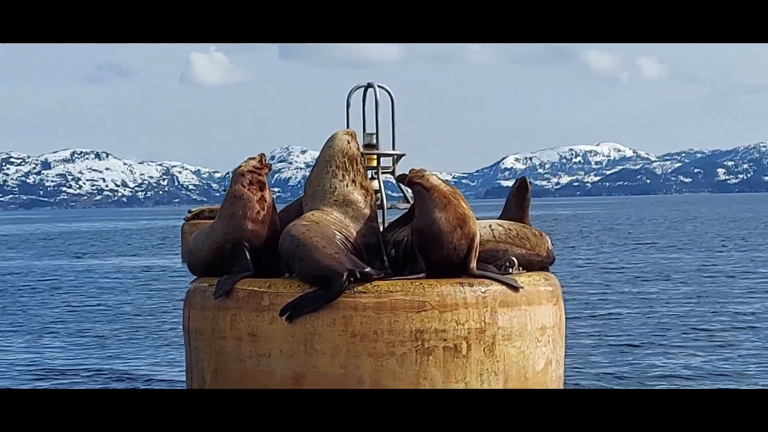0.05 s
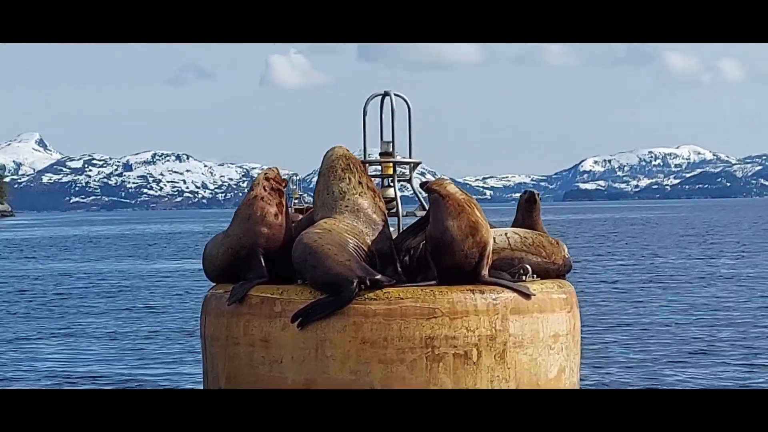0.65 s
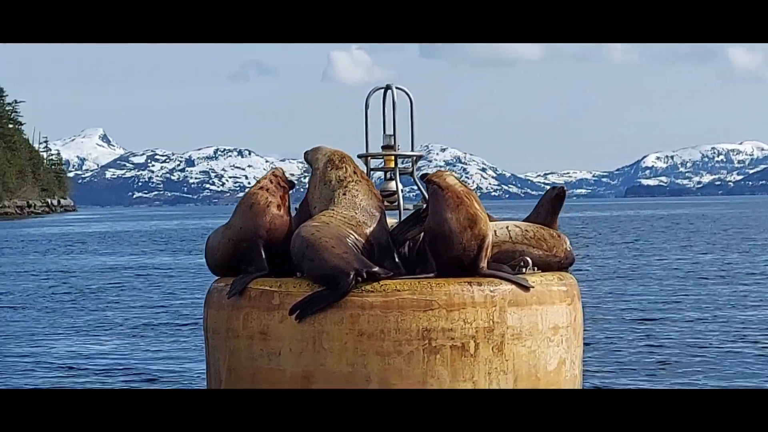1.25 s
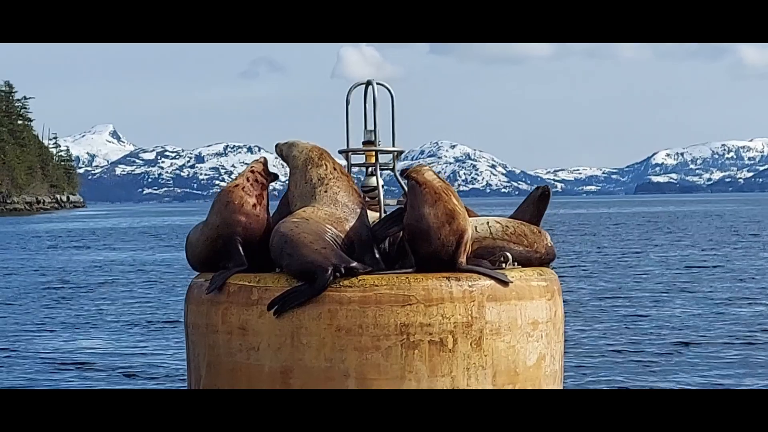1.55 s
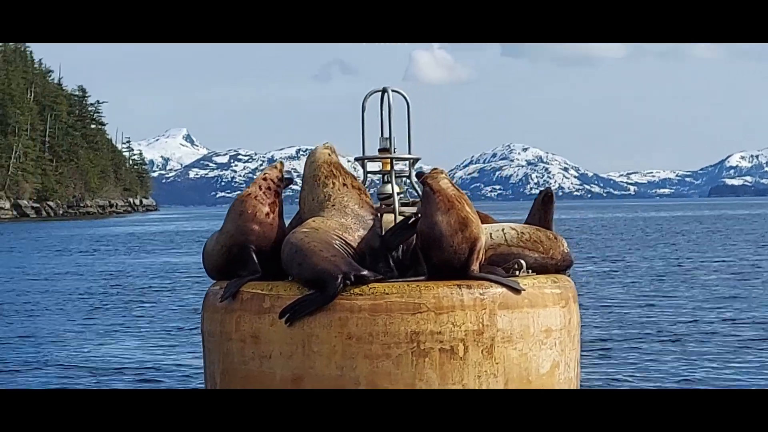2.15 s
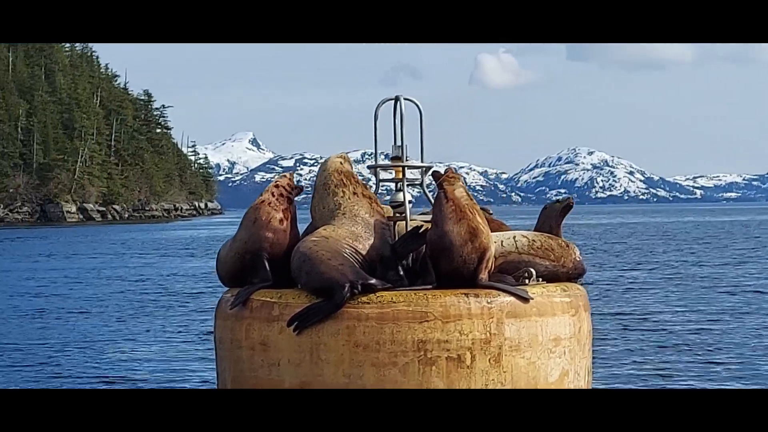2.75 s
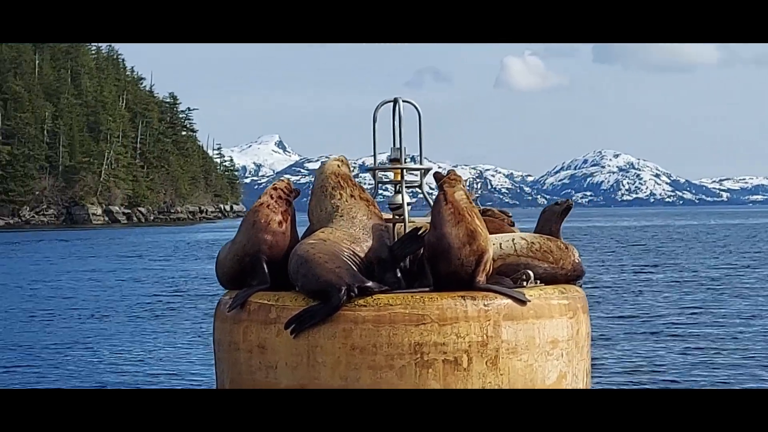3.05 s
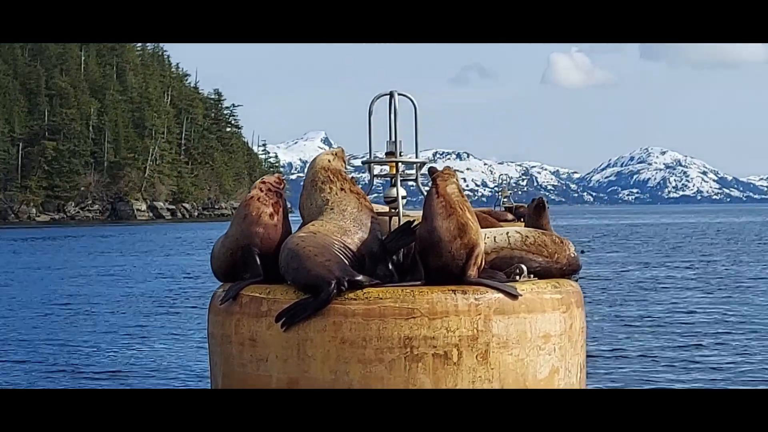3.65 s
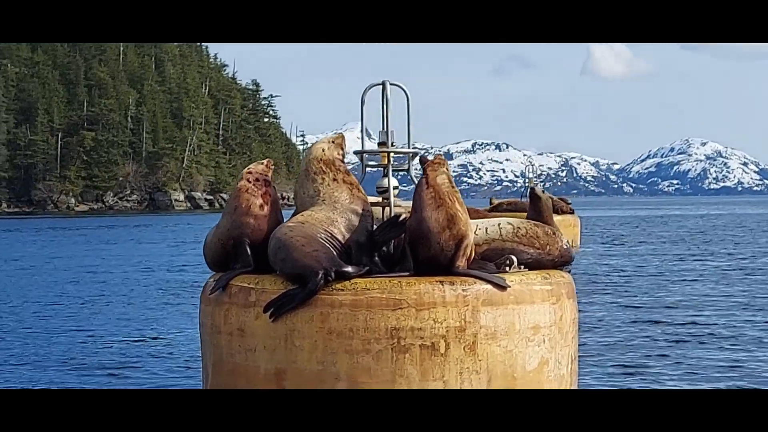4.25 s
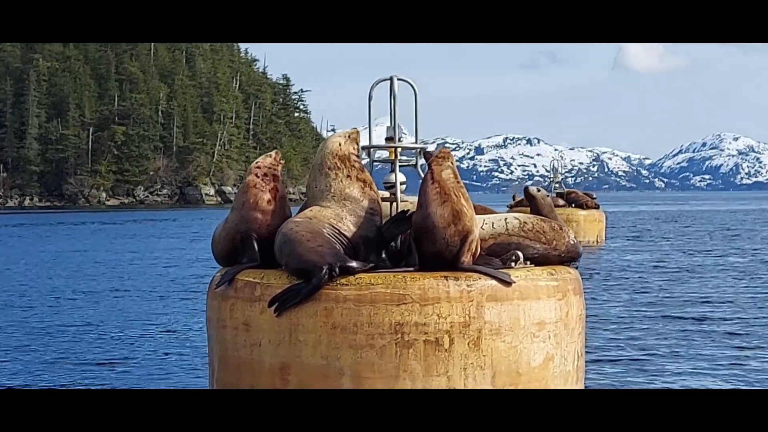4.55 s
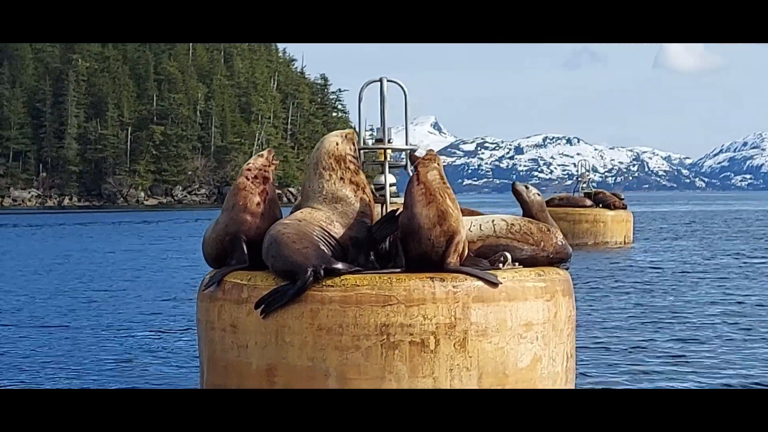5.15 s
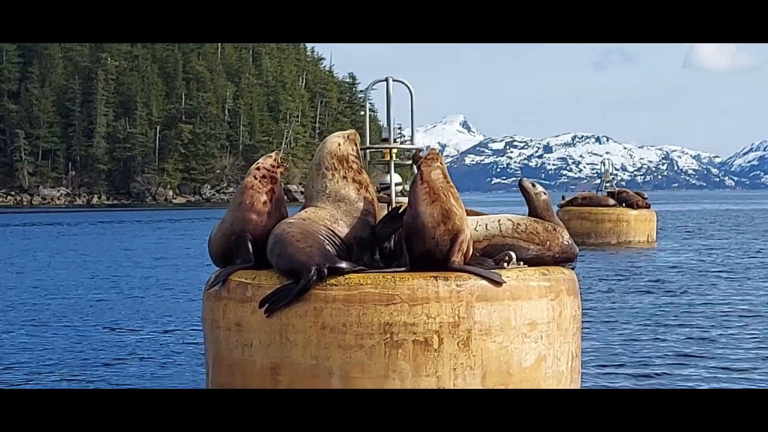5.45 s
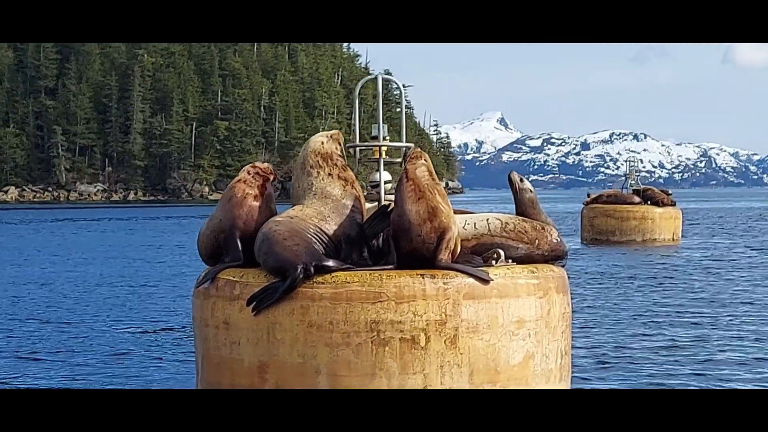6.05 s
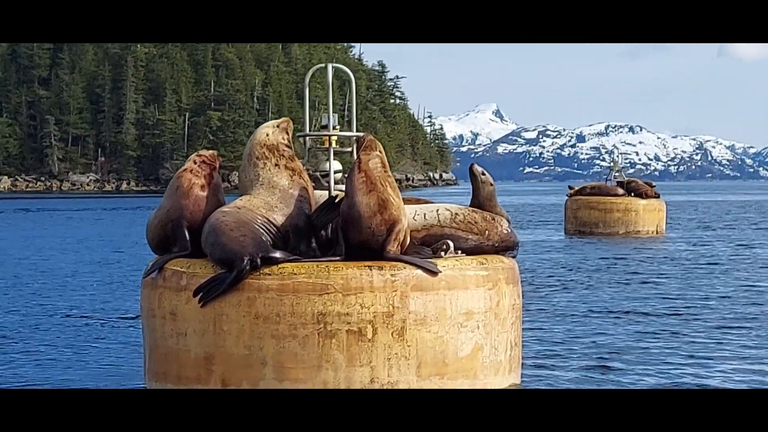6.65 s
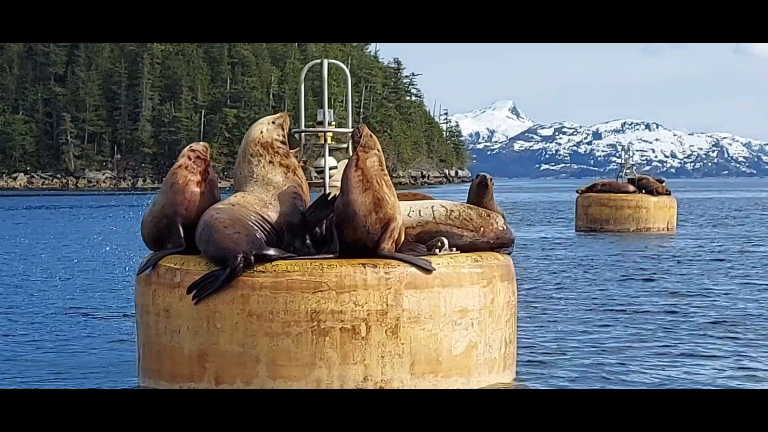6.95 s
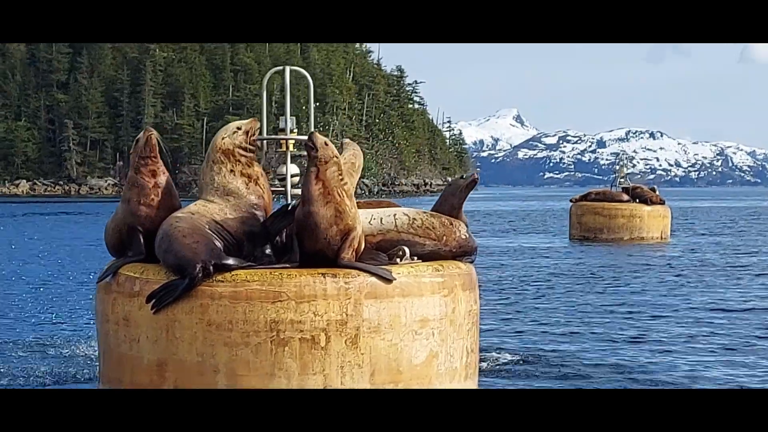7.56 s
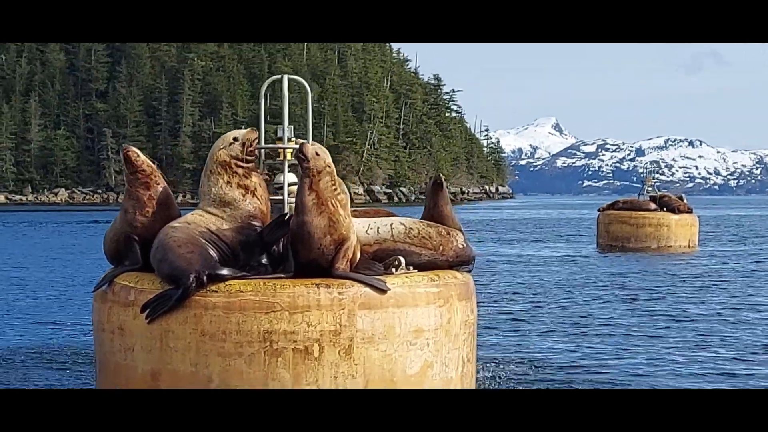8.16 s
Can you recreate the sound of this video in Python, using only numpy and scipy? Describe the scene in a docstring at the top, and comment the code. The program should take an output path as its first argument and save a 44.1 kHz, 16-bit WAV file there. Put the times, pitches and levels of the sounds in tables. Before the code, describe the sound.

Sea lions on a steel buoy give a loud rough roar, a hoarse rasp and a run of low growls. After a short pause comes a throaty bellow, then quieter growls and a rattle. A light splash follows near the end, with two more hoarse growls. The microphone is on an idling boat, its engine throbbing low throughout, with wind bumps, faint lapping water and scattered small knocks.

```python
"""Sea lions roar and growl on a steel buoy, heard across water from an idling boat.
Each call is a train of throat flaps, about 20-65 a second, that ring the animal's mouth and chest
and hiss through its jaws. The engine throbs below, wind bumps the microphone, water laps and
splashes, and small knocks sound. Calls and knocks echo briefly off buoy, water and boat."""
import sys
import numpy as np
from scipy import signal
from scipy.fft import rfft, irfft, next_fast_len
from scipy.io import wavfile
from scipy.ndimage import uniform_filter1d, map_coordinates

SR = 44100
rng = np.random.default_rng(int(sys.argv[2]) if len(sys.argv) > 2 else 0)


def digitize_waveform(pressure):
    """Quantize a signal to 16-bit integers and store it at the path in sys.argv[1].

    Rows of a 2-D input are taken as channels; values are limited to [-1, 1].
    """
    field = np.atleast_2d(pressure).T
    bounded = np.clip(field, -1, 1)
    quanta = np.round(bounded * 32767).astype(np.int16)
    wavfile.write(sys.argv[1], SR, quanta)


N = 371322
T = np.arange(N) / SR

# Jaw resonances of growls and rattle. Each row: centre in Hz, width in Hz, relative gain in dB.
GROWL_JAWS = [(1310, 130, 8), (1840, 180, 10), (2180, 180, 3), (3200, 170, -15.5), (3900, 280, -13.5),
              (5000, 390, -9.5), (8200, 1600, -22)]
# A wave breaking on the buoy. Each row: time in seconds, base level in dB.
SPLASH = [(7.06, -72), (7.24, -60.5), (7.48, -55.5), (7.8, -55.5), (7.9, -67), (8, -101)]


def sea_lions():
    """A crisp roar, a hoarse rasp, a bellow that opens into a higher vowel, a rattle and growls."""
    # Calls. Each row: time in seconds, flaps per second, mouth resonance in Hz, base level in dB.
    roar = [(0.212, 40.6, 710, -26), (0.31, 41.6, 698, -25), (0.407, 43.6, 715, -24),
            (0.504, 51.5, 697, -19), (0.602, 52.1, 687, -21.5), (0.699, 48.8, 709, -23),
            (0.757, 32, 717, -24.5), (0.802, 21.7, 700, -30.5)]
    rasp = [(0.817, 52.6, 680, -48), (0.925, 54.65, 680, -42.5), (1.0, 57.46, 605, -33.5),
            (1.15, 57.04, 643, -37.5), (1.25, 65.07, 600, -30.5), (1.33, 54.15, 620, -34.5),
            (1.39, 56.47, 636, -31), (1.45, 50.6, 615, -38), (1.52, 48.8, 590, -30)]
    bellow = [(4.066, 45, 597, -33.5), (4.125, 50.48, 616, -27.5), (4.28, 55.87, 603, -23),
              (4.358, 59.4, 628, -27)]
    bellow_tail = [(4.366, 57.5, 676, -29.5), (4.437, 56.5, 699, -27), (4.48, 55.5, 670, -27.5),
                   (4.583, 53.3, 659, -27), (4.7, 53, 652, -27.5), (4.755, 42, 673, -36),
                   (4.795, 19, 670, -35)]
    rattle = [(5.939, 22.44, 635, -45.5), (6.048, 29.24, 680, -39), (6.156, 31.75, 613, -39),
              (6.265, 26.6, 630, -39), (6.374, 26.44, 660, -47.5), (6.49, 27.6, 625, -44)]
    # Throat resonances, mouth at rest. Each row: centre in Hz, width in Hz, relative gain in dB.
    roar_throat = [(410, 87, -9), (696.5, 39.5, 12.5), (994, 165, -9.5), (1023, 41, -8.5), (1545, 140, -17),
                   (1820, 41, -20.5)]
    rasp_throat = [(357, 74, -2), (596, 69, -1), (737, 65, -4.5), (1170, 110, -17), (1610, 89, -26)]
    bellow_throat = [(403, 46, -3.5), (617, 23, -0.5), (746, 230, -21.5), (948, 94, -17), (1550, 44, -36)]
    bellow_tail_throat = [(383, 32, 2.5), (634, 88, 2.5), (702, 67, 2), (957, 47, -14), (1140, 220, -30.5),
                          (1630, 110, -31.5)]
    rattle_throat = [(381, 45, 13), (660, 200, 2), (976, 120, 1.5), (2000, 71, -20)]
    # Front of the mouth, shaped by tongue and lips.
    # Each row: time in seconds, resonance in Hz, its level and the jaw hiss in dB re the throat.
    roar_lips = [(.215, 3040, -24, -30), (.26, 2970, -30, -22), (.29, 2300, -19, -34),
                 (.34, 2370, -33, -47), (.4, 3270, -35, -25.5), (.55, 3270, -41, -38),
                 (.62, 3390, -30, -29), (.71, 3380, -30, -25.5), (.76, 3500, -50, -26.5)]
    rasp_lips = [(.83, 1100, -6.5, -10), (1.0, 1090, -15, -18.5), (1.2, 1030, -16, -21.5),
                 (1.31, 1120, -14, -32), (1.4, 1187, -4.5, -11), (1.445, 1190, -5.5, -13),
                 (1.475, 1240, -15, -31)]
    bellow_lips = [(4.064, 1830, -24, -27), (4.115, 1820, -16, -35), (4.21, 1780, -25, -41),
                   (4.3, 1870, -27.5, -29.5)]
    bellow_tail_lips = [(4.4, 1580, -29, -28.5), (4.5, 1470, -31, -34), (4.6, 1680, -29, -35),
                        (4.8, 1550, -36, -34)]
    rattle_lips = [(6, 1900, -33, -40)]
    # Jaw resonances. Each row: centre in Hz, width in Hz, relative gain in dB.
    roar_jaws = [(2015, 77, 17), (2620, 60, -8), (4270, 120, -9), (4980, 110, 0), (8050, 1000, -16)]
    rasp_jaws = [(1550, 110, 9), (1925, 240, 0), (2500, 120, -6), (3070, 110, -19), (3380, 42, -18)]
    bellow_jaws = [(2220, 99, 4), (2630, 65, 1), (3100, 60, 5), (3830, 60, -1), (4180, 51, 15),
                   (5200, 71, -9), (7900, 1800, -20)]
    bellow_tail_jaws = [(2040, 380, 1), (2600, 100, 0), (3170, 160, -5), (3760, 180, -3), (4290, 130, 10),
                        (5100, 230, 1), (7850, 1800, -15)]
    # Flap textures. Each: roughness, puff t60 in seconds, level scatter in dB.
    crisp, throaty, hoarse = (.3, .026, 1.0), (.6, .036, 1.2), (.8, .024, 1.8)
    return (call(roar, roar_throat, roar_lips, roar_jaws, crisp, rest_hz=701.5,
                 gain_db=-2.5, gargle=.016)
            + call(rasp, rasp_throat, rasp_lips, rasp_jaws, hoarse, rest_hz=620, gain_db=-.5,
                   overtone_db=-25, gargle=.021, gargle_db=-1, click=.74, hiss_t60_s=.027)
            + call(bellow, bellow_throat, bellow_lips, bellow_jaws, throaty, rest_hz=604.5,
                   gain_db=-1, click=.8, gargle=.013)
            + call(bellow_tail, bellow_tail_throat, bellow_tail_lips, bellow_tail_jaws, throaty,
                   rest_hz=673, click=.53, gargle=.015)
            + call(rattle, rattle_throat, rattle_lips, GROWL_JAWS, crisp, rest_hz=636,
                   gain_db=.5, flutter=.14)
            + growls())


def growls(attack_s=.06, release_s=.061, lips_hz=905, shut_db=-11, puff_t60_s=.02, scatter_db=1.1):
    """Flap rate and mouth glide evenly; lips and hiss peak mid-growl, where the jaws are widest."""
    # Each row: start and length in seconds, first and last flaps per second, first and last mouth
    # resonance in Hz, level in dB, roughness, lips and hiss in dB re the throat.
    events = [(1.557, .63, 31.4, 31.3, 612, 672, -33.8, 0.1, -19, -32),
              (2.224, 0.52, 51, 38.2, 655, 660, -30.5, 0.33, -15, -19),
              (2.755, .12, 33.7, 34.4, 675, 690, -32.5, 0.25, -16, -22),
              (2.87, 0.13, 38, 54, 697, 655, -27.5, 0.18, -26, -25),
              (3.007, 0.12, 49, 50, 640, 650, -32, 0.3, -25, -22),
              (3.148, 0.22, 55, 48, 636, 557, -34, 0.35, -24, -22),
              (5.14, 0.18, 56, 48, 570, 600, -46, 0.5, -26, -28),
              (5.46, .2, 47, 48, 570, 600, -47.5, 0.6, -24, -30),
              (8.066, .2, 38.7, 42, 631, 700, -35.5, 1.3, -13, -20),
              (8.28, .22, 46.5, 56, 651, 720, -33, 1.4, -14, -20)]
    # Each row: centre in Hz, width in Hz, relative gain in dB.
    throat = [(98, 55, 8), (230, 150, -1), (405.5, 30, 4), (689, 48, 5), (604.6, 75, 5.5), (893, 56, -13),
              (1310, 54, -37)]
    envelope_db, closing_db = np.array([-2, 0, 0, -6]), shut_db * np.array([1, 0, 1])
    voice = np.zeros(N)
    for s, length_s, rate0, rate1, hz0, hz1, db, rough, lips_db, hiss_db in events:
        knees_s = np.sort([0, attack_s, length_s - release_s, length_s])
        glide = lambda a, b: a + (b - a) * knees_s / length_s
        contour = np.transpose([s + knees_s, glide(rate0, rate1), glide(hz0, hz1), db + envelope_db])
        lips_s = s + length_s * np.array([0, .5, 1])
        lips = np.transpose([lips_s, [lips_hz] * 3, lips_db + closing_db / 2, hiss_db + closing_db])
        texture = (rough, puff_t60_s, scatter_db)
        voice += call(contour, throat, lips, GROWL_JAWS, texture, rest_hz=640, gargle=.045, gargle_db=4)
    return voice


def call(contour, throat, lips, jaws, texture, rest_hz, gain_db=0, gargle=.0052, gargle_db=6.5,
         gargle_per_s=22.16, overtone_db=-30, hiss_t60_s=.023, click=.4, flutter=.036, chest_hz=500):
    """Each throat flap is a sharp closure and a dying puff of air; both ring throat, lips and jaws."""
    rough, puff_t60_s, scatter_db = texture
    span_s = np.arange(contour[0][0], contour[-1][0], 1 / SR)
    cycles = np.cumsum(curves(contour, span_s)[0]) / SR
    flaps_s = np.interp(np.arange(int(cycles[-1]) + 1), cycles, span_s)
    count = len(flaps_s)
    flap_hz, mouth_hz, db = curves(contour, flaps_s)
    flaps_s += .05 * rough * rng.standard_normal(count) / flap_hz  # a rough throat flaps unevenly
    lips_hz, lips_db, hiss_db = curves(lips, flaps_s[:, None])
    t, hz = np.arange(4096) / SR, np.fft.rfftfreq(4096, 1 / SR)

    def unit_energy(x):
        return x / np.linalg.norm(x, axis=1, keepdims=True)

    def puff(t60_s, rise_s=.0016):
        envelope = amp(-60 * t / t60_s) * (1 - np.exp(-t / rise_s))
        return rfft(unit_energy(rng.standard_normal((count, len(t))) * envelope))

    def drift():
        knots = abs(flaps_s - flaps_s[0]) * gargle_per_s
        return map_coordinates(rng.standard_normal(2 * count), [knots])[:, None]

    # The jaw shifts the mouth's resonances at each flap; the chest's stay.
    shift = (mouth_hz / rest_hz * (1 + flutter * rough * rng.standard_normal(count)))[:, None]
    modes = [(f if f < chest_hz else f * shift, width, level) for f, width, level in throat]
    radiated = minimum_phase(resonances(modes, hz) * highpass(hz, 130))  # a mouth radiates little bass
    rings = unit_energy(irfft((1 + rough * puff(puff_t60_s)) * radiated))
    lip_modes = [(lips_hz, 70, 0), (1.35 * lips_hz, 300, -22), (2.8 * lips_hz, 300, overtone_db)]
    lip_band = hz / np.hypot(hz, lips_hz) / np.hypot(1, (hz / 4500) ** 2)
    lip_ring = irfft((click + puff(hiss_t60_s)) * resonances(lip_modes, hz) * lip_band)
    rings += amp(lips_db) * unit_energy(lip_ring)
    # Gargle: each resonance of the wet jaws wanders in pitch and strength.
    jaw_modes = [(f * (1 + gargle * drift()), width, level + gargle_db * drift())
                 for f, width, level in jaws]
    hiss = irfft((click + puff(hiss_t60_s)) * resonances(jaw_modes, hz) * hz / np.hypot(hz, 1500))
    rings += amp(hiss_db) * unit_energy(hiss)
    sizes = amp(db + gain_db + scatter_db * rng.standard_normal(count)) * np.sqrt(SR / flap_hz)
    voice = np.zeros(N)
    for s, size, ring in zip(flaps_s, sizes, rings):
        add(voice, s, size * ring)
    return voice


def engine(firing_hz=32, tone_db=-4, thump_db=-8, waver_db=4.5, hull_db=-35, hull_db_per_db=.35):
    """Uneven firings thump the exhaust; low orders hum and the hull drones in time with them."""
    # Each row: time in seconds, base level in dB.
    levels = [(0.0, -43.5), (0.2, -32), (1.15, -31), (1.6, -35.5), (1.9, -45.5), (2.1, -32), (2.8, -26),
              (3.1, -32.5), (3.45, -33), (3.6, -41), (3.95, -34.5), (5.0, -34), (5.7, -47), (6.5, -35.5),
              (7.5, -40), (8.1, -39.5)]
    # Each row: multiple of the firing rate, relative level in dB.
    orders = [(2, -17), (3, 6), (4, 10.5)]
    # Each row: centre in Hz, width in Hz, relative gain in dB.
    exhaust_modes = [(63.4, 44, -1.5), (101.8, 30, 1.5), (296, 50, -9.5)]
    # Each row: frequency in Hz, relative density in dB.
    hull_spectrum = [(60, -10), (150, -4), (200, -11.5), (260, -4), (315, 4), (370, -6), (430, -6),
                     (500, -10), (640, -13), (800, -21), (1200, -24.5), (2500, -40.5), (6000, -81)]
    stereo_wobble = lambda per_s: np.array([wobble(per_s), wobble(per_s)])
    level_db, = curves(levels)
    cycles = firing_hz * T + .04 * wobble(3) - .2
    sizes = amp(3.5 * np.tanh(wobble(28)) + 3.5 * np.tanh(stereo_wobble(24)))
    firings = np.diff(np.floor(cycles), prepend=-1) * sizes
    thumps = unit(filtered(firings, lambda hz: -resonances(exhaust_modes, hz) * highpass(hz, 50)))
    hum = sum(amp(db + 2 * stereo_wobble(9)) * np.sin(2 * np.pi * k * cycles + .9 * stereo_wobble(5))
              for k, db in orders)
    exhaust = amp(thump_db) * thumps + amp(tone_db) * unit(hum)
    exhaust *= amp(level_db + waver_db * np.tanh(wobble(14)))
    throb = 1 + .35 * np.cos(2 * np.pi * cycles - 1)
    hull = unit(rush(hull_spectrum, patchy_db=3) * throb * amp(wobble(16)))
    hull *= amp(hull_db + hull_db_per_db * (level_db - level_db.mean()))
    return exhaust * pan(1.6) + hull


def wind(breeze_db=-39.5, lump_db=3, bump_db=-4, bump_hz=90, rise_s=.0041):
    """A gusty breeze buffets the microphone, with single soft bumps."""
    # Each row: centre and half width in seconds, level in dB.
    gusts = [(.2, 0.065, -35), (1.3, 0.057, -31), (1.68, 0.22, -34), (2.35, 0.062, -28), (2.8, 0.24, -37),
             (4.15, 0.22, -36), (4.65, 0.13, -41), (5.4, .15, -37.5), (6.1, 0.39, -37), (8.03, 0.11, -29)]
    # Each row: frequency in Hz, relative density in dB.
    buffet_spectrum = [(10, -17), (30, -11), (60, -4.5), (100, -1), (200, -9.5), (500, -23), (2000, -65)]
    # Each row: time in seconds, base level in dB.
    bumps = [(1.245, -16), (1.569, -16.5), (1.602, -13.5), (5.303, -17), (5.665, -20.5), (6.489, -17),
             (6.617, -20.5), (7.683, -19), (7.993, -19)]
    gust_power = sum((amp(db) * swell(s, width_s)) ** 2 for s, width_s, db in gusts)
    strength = np.sqrt(amp(breeze_db) ** 2 + gust_power)
    air = strength * unit(rush(buffet_spectrum, patchy_db=5.5) * amp(lump_db * wobble(5.4)))
    t = np.arange(SR // 8) / SR
    push = t / rise_s * np.exp(1 - t / rise_s)
    for s, db in bumps:
        hz = bump_hz * np.exp(rng.standard_normal() / 10)
        add(air, s - rise_s, amp(db + bump_db) * push * np.sin(2 * np.pi * hz * t))
    return air * pan(1.5)


def knocks(gain_db=-1, crack_db=-19, crack_t60_s=.0053, attack_s=.00011, soft_hz=8000):
    """Damped knocks and plops: a noise burst into one resonance each; broad ones start with a crack."""
    # Each row: start in seconds, base peak in dB, centre and width in Hz, burst t60 in seconds.
    events = [(0.756, -37, 3520, 710, 0.074), (1.517, -19, 3000, 4130, 0.0048),
              (1.637, -39, 3200, 1200, 0.02), (2.337, -36.5, 1650, 686, 0.11),
              (2.492, -43, 2420, 120, 0.025), (2.656, -36, 3180, 250, 0.016),
              (3.059, -40.5, 4100, 700, 0.022), (3.546, -41, 4430, 2020, 0.019),
              (3.779, -39, 6300, 3000, 0.015), (3.8095, -25.5, 3520, 885, 0.0062),
              (4.699, -38.5, 2180, 903, 0.18), (4.887, -36, 980, 450, 0.0074),
              (5.039, -43, 1520, 170, .016), (5.11, -40.5, 980, 59.6, 0.017), (5.218, -39, 1240, 794, .005),
              (5.238, -34.5, 1170, 900, 0.0056), (5.464, -39, 1000, 700, 0.0099),
              (2.344, -16.5, 300, 50, 0.021), (2.529, -18.5, 342, 50, 0.039),
              (2.564, -38, 1140, 110, 0.025), (2.818, -39, 1850, 700, 0.016),
              (6.025, -37, 3600, 2530, .006), (8.092, -23, 634, 120, 0.014), (8.261, -40, 1970, 200, .01),
              (5.677, -46, 7050, 4000, 0.015), (5.804, -44.5, 4850, 4970, 0.13),
              (6.011, -30, 4670, 1400, 0.0092), (6.267, -40, 1970, 347.7, 0.2),
              (6.522, -31.5, 1566, 300, 0.1), (6.557, -32.5, 2320, 602, 0.094),
              (6.7081, -14, 784, 702, 0.0048), (6.7094, -29.5, 1750, 700, 0.023),
              (6.79, -46, 6550, 1200, 0.031), (7.479, -39, 1880, 244, 0.018), (7.6, -39, 1820, 200, 0.018),
              (8.112, -36, 4140, 4000, 0.019), (8.185, -48, 1990, 400, .04),
              (8.286, -33.5, 4660, 4030, 0.036)]
    track, t, hz = np.zeros(N), np.arange(4096) / SR, np.fft.rfftfreq(4096, 1 / SR)
    for s, db, centre_hz, width_hz, t60_s in events:
        burst = rng.standard_normal(len(t)) * amp(-60 * t / t60_s) * (1 - np.exp(-t / attack_s))
        body = resonances([(centre_hz, width_hz, 0)], hz) / (1 + 1j * hz / (soft_hz + centre_hz))
        knock = irfft(rfft(burst) * body)
        crack = rng.standard_normal(len(t)) * amp(crack_db - 60 * t / crack_t60_s)
        crack *= min(width_hz / 3000, 1)
        add(track, s, amp(db + gain_db) * (knock / np.abs(knock).max() + crack))
    return track


def sea(wash_db=.5, spray_db=-71, spray_db_per_db=2.7, foam_db=-1, drops_per_s=120, drop_db=-9):
    """Water washes round the hull and foams on the buoy; spray hisses and droplets tick."""
    # Lapping water. Each row: time in seconds, base level in dB.
    chop = [(0, -57), (4.6, -58.5), (5.3, -61), (7.1, -58), (7.6, -58.5), (8.42, -58)]
    # Swells of broad hiss, mostly the animals' breath during calls.
    # Each row: centre and half width in seconds, base levels of the wash and spray bands in dB.
    hiss_swells = [(.17, 0.053, -52.5, -66), (.5, 0.12, -49, -56), (2.62, 0.16, -54, -66.5),
                   (3.15, 0.24, -55.5, -68.5), (4.38, 0.25, -53.5, -67), (7.26, .09, -54.5, -78),
                   (8.35, 0.25, -55.5, -63)]
    # Each row: frequency in Hz, relative density in dB.
    wash_spectrum = [(300, -40), (900, 13), (1250, 10.5), (1570, 2), (1900, 8), (2850, 2.5), (4000, 4),
                     (5200, 1), (8000, -6), (10000, -15.5), (15000, -27)]
    spray_spectrum = [(2000, -20), (5000, 11), (8000, 10), (10000, 6.5), (12000, 11.5), (13500, 3.5),
                      (15600, 0)]
    foam_spectrum = [(800, -7), (1550, -19), (1750, 16), (1900, 11), (2100, 12), (2850, 3), (3500, 12.5),
                     (4800, 10.5), (7500, 6.5), (10000, 5), (14000, 0), (15600, -8)]
    chop_db, = curves(chop)
    wash_gain = amp(chop_db)
    spray_gain = amp(spray_db + spray_db_per_db * (chop_db - chop_db.mean()))
    for s, width_s, mid_db, treble_db in hiss_swells:
        envelope = swell(s, width_s)
        wash_gain = np.hypot(wash_gain, amp(mid_db) * envelope)
        spray_gain = np.hypot(spray_gain, amp(treble_db) * envelope)
    hits = rng.random((2, N)) < drops_per_s / SR
    drops = hits * amp(9 * np.minimum(rng.exponential(size=(2, N)), 3))
    ticks = unit(filtered(drops, lambda hz: amp(along(wash_spectrum, hz))))
    wash = rush(wash_spectrum, patchy_db=.8)
    spray = rush(spray_spectrum, patchy_db=.8)
    foam = rush(foam_spectrum, patchy_db=2.2)
    spray *= spray_gain * amp(3.5 * wobble(40))
    foam *= amp(curves(SPLASH)[0] + foam_db + np.tanh(wobble(64)))
    wash *= amp(wash_db + wobble(22))
    return wash_gain * (wash + amp(drop_db) * ticks) + (spray + foam) * pan(.9)


def spatter(drops_per_s=130, bubble_hz=1900, bubble_db=6.5, tick_hz=4600, tick_db=5.5, t60_cycles=24):
    """Drops from the splash fall back: half ring a bubble, the others only tick."""
    track, t = np.zeros((2, N)), np.arange(SR // 30) / SR
    start_s, end_s = SPLASH[0][0], SPLASH[-1][0]
    for k in range(int((end_s - start_s) * drops_per_s)):
        s = rng.uniform(start_s, end_s)
        pitch, size, side = np.clip(rng.standard_normal(3), -2, 2)
        centre_hz, spread, db = (bubble_hz, .045, bubble_db) if k % 2 else (tick_hz, .36, tick_db)
        hz = centre_hz * np.exp(spread * pitch)
        drop = np.sin(2 * np.pi * hz * t) * amp(-60 * t * hz / t60_cycles)
        add(track, s, amp(curves(SPLASH, s)[0] + db + 4 * size) * pan(2 * side) * drop)
    return track


def echo(x, delay_s=.003135, fade_s=.3):
    """Diffuse echo off buoy, water and boat, as mid and side; the paths change as the boat drifts."""
    # Each row: frequency in Hz, t60 in seconds.
    decay = [(200, 0.33), (1000, 0.21), (8000, 0.01)]
    hz, t, noise = signal.stft(rng.standard_normal((2, SR // 4)), SR, nperseg=256)
    envelope = amp(-60 * t / along(decay, hz)[:, None])
    wet = np.zeros((2, N))
    for s in np.arange(0, N / SR + fade_s, fade_s):
        phases = np.exp(2j * np.pi * rng.random(noise.shape))
        tail = signal.istft(noise * phases * envelope, SR, nperseg=256)[1]
        tail /= np.linalg.norm(tail[0])
        near = np.flatnonzero(abs(T - s) < fade_s)
        part = x[near] * np.cos(np.pi / 2 * (T[near] - s) / fade_s)
        add(wet, T[near[0]] + delay_s, signal.fftconvolve(part[None], tail, axes=1))
    return wet


def rush(spectrum, patchy_db):
    """Stereo noise of rms 1 with random gain patches in time and frequency."""
    # Each row: frequency in Hz, left-right correlation.
    correlation = [(40, 0), (300, 0.31), (900, 0), (2500, 0), (8000, 0)]

    def mid_side_gains(hz):
        angle = np.arccos(along(correlation, hz)) / 2
        return amp(along(spectrum, hz)) * np.array([np.cos(angle), np.sin(angle)])

    noise = signal.stft(rng.standard_normal((2, N)), nperseg=512)[2]
    patches = uniform_filter1d(rng.standard_normal(noise.shape[1:]), size=6, axis=0)
    patches = unit(uniform_filter1d(patches, size=8, axis=1))
    pair = signal.istft(noise * amp(patchy_db * patches), nperseg=512)[1][:, :N]
    mid, side = filtered(pair, mid_side_gains)
    return unit(np.array([mid + side, mid - side]))


def resonances(modes, hz):
    """Causal response of (centre Hz, width Hz, dB) modes, alternating in sign."""
    return sum((-1) ** k * amp(db) * f * width / (f * f - hz * hz + 1j * hz * width)
               for k, (f, width, db) in enumerate(modes))


def highpass(hz, corner_hz):
    """Two-pole high-pass response."""
    return (1j * hz / (1j * hz + corner_hz)) ** 2


def minimum_phase(response):
    """The same gains with the most abrupt attack they allow."""
    cepstrum = irfft(np.log(np.abs(response) + 1e-6))
    half = cepstrum.shape[-1] // 2
    return np.exp(rfft(cepstrum * np.r_[1, np.full(half - 1, 2), 1, np.zeros(half - 1)]))


def filtered(x, response):
    """Filter x by response(hz)."""
    size = next_fast_len(N + SR // 2)
    return irfft(rfft(x, size) * response(np.fft.rfftfreq(size, 1 / SR)), size)[..., :N]


def curves(rows, at_s=T):
    """Each column after the time, interpolated at at_s."""
    times_s, *columns = np.transpose(rows)
    return [np.interp(at_s, times_s, column) for column in columns]


def along(points, hz):
    """Interpolate (Hz, value) points on a log axis."""
    points_hz, values = np.transpose(points)
    return np.interp(np.log(hz + 1), np.log(points_hz + 1), values)


def wobble(knots_per_s):
    """Smooth random curve."""
    knots, coarse_s = rng.standard_normal(int(N * knots_per_s / SR) + 4), T[::64]
    return np.interp(T, coarse_s, map_coordinates(knots, [coarse_s * knots_per_s]))


def swell(centre_s, width_s):
    """Gaussian rise and fall."""
    return np.exp(-((T - centre_s) / width_s) ** 2 / 2)


def add(track, start_s, sound):
    """Mix a sound into a track."""
    part = track[..., max(round(start_s * SR), 0):][..., :sound.shape[-1]]
    part += sound[..., :part.shape[-1]]


def amp(db):
    """Decibels to gain."""
    return 10 ** (np.asarray(db) / 20)


def pan(db):
    """Stereo gains: left up by db, right down."""
    return amp([[db], [-db]])


def unit(x):
    """Scale to rms 1."""
    return x / np.sqrt(np.mean(x ** 2) + 1e-20)


def scene(echo_db=-12, spread_hz=1000):
    """Herd and knocks in front; boat, wind and water all round."""
    front = sea_lions() + knocks()
    mid, side = echo(front)
    side = filtered(side, lambda hz: hz / np.hypot(hz, spread_hz))  # only the echo's treble is wide
    around = np.array([mid + side, mid - side]) / np.sqrt(2)
    return front * pan(.2) + amp(echo_db) * around + engine() + wind() + sea() + spatter()


def record(dry):
    """Brick-wall low-pass."""
    return filtered(dry, lambda hz: hz < 15700)


dry = scene()
out = record(dry)
digitize_waveform(out)
```